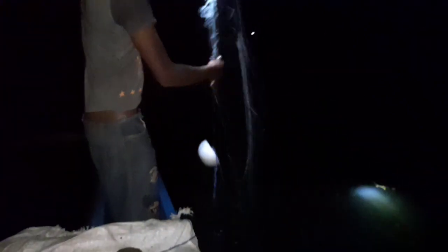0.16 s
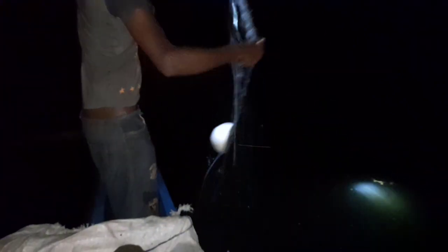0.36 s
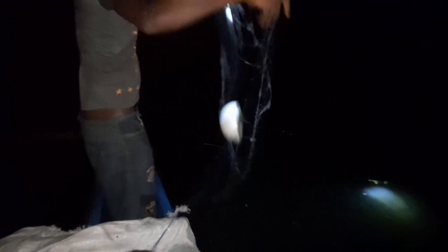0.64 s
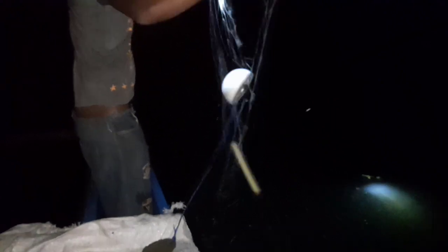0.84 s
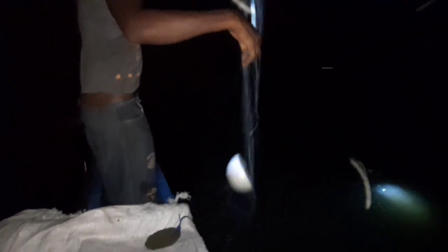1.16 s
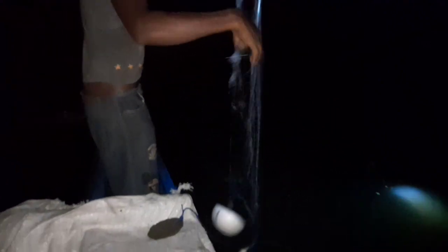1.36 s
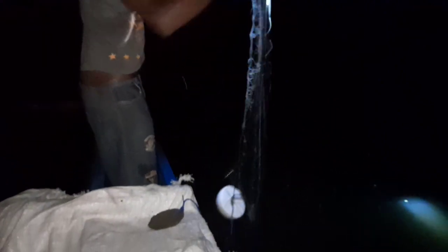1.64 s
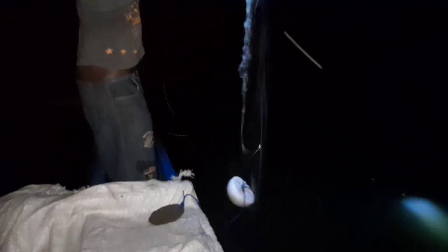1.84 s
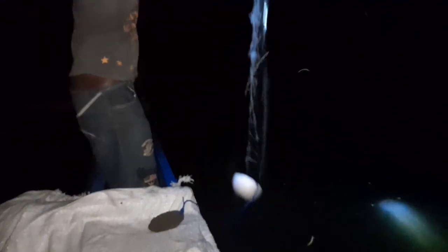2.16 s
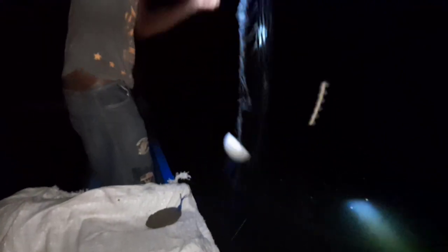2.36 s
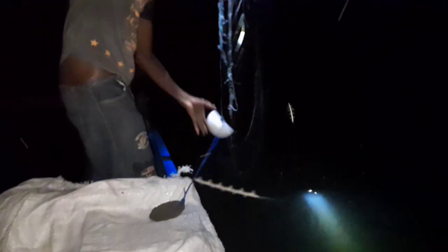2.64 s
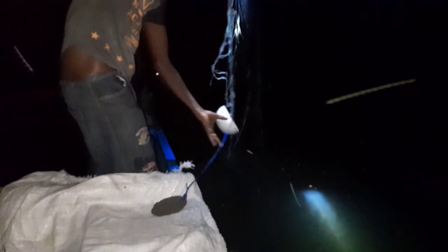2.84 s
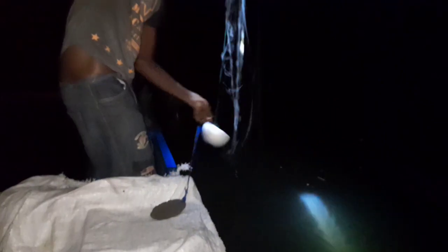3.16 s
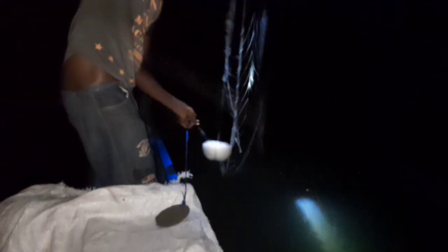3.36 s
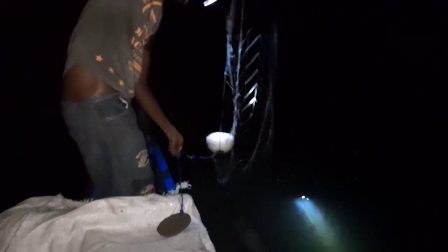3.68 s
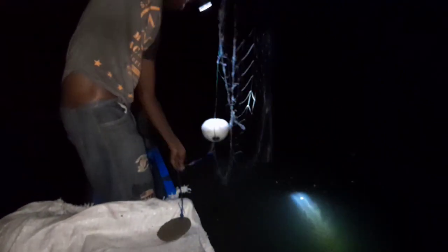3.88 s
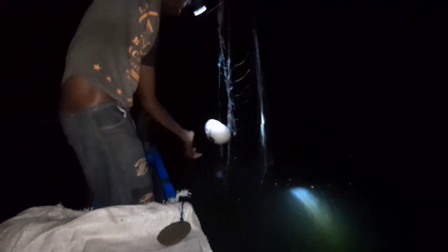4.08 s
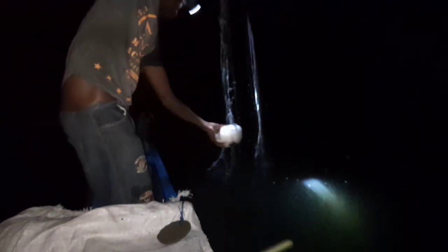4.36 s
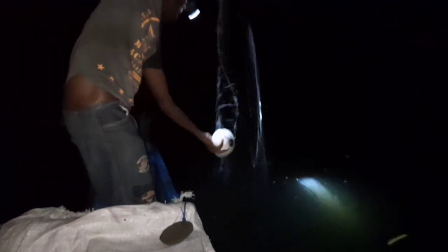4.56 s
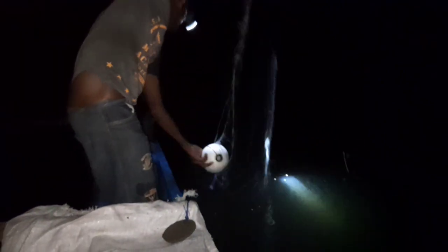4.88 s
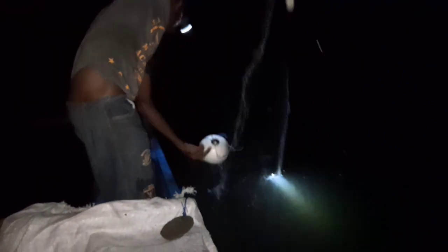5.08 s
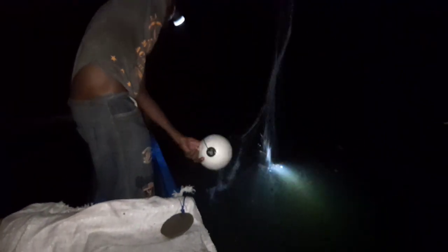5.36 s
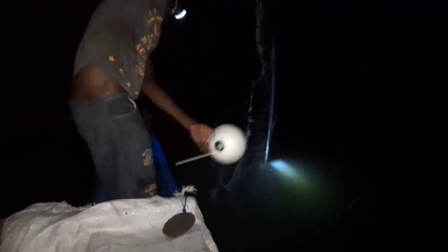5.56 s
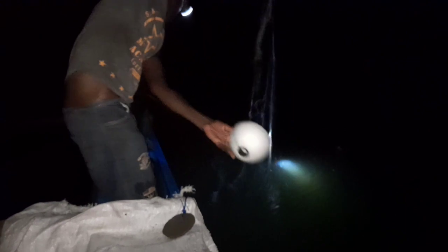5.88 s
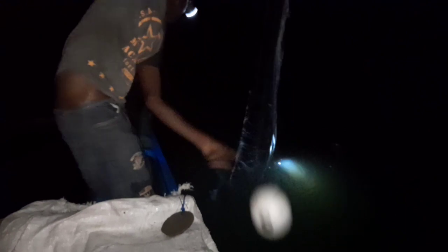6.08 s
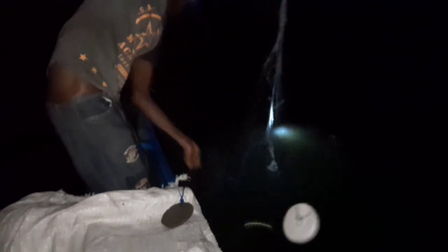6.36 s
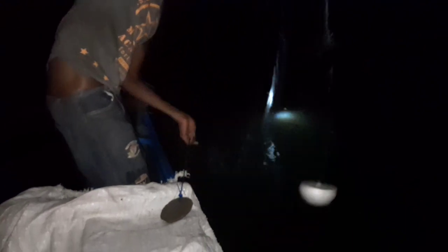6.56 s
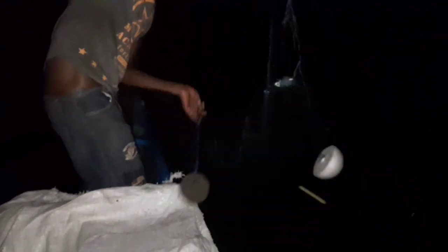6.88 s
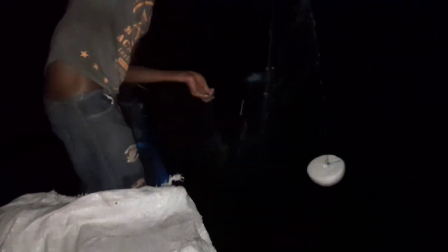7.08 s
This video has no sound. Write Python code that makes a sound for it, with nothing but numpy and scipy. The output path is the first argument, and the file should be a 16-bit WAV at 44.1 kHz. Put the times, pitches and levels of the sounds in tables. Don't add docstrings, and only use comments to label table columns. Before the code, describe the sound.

Insects sing steadily on a riverbank, one cricket chirping near, another in short far phrases, and a bush cricket ticking in fast high trills. Close to the microphone a wet net is dragged in roughly, leads clacking and hull booming, water spraying. It slackens to drips, plops and small snaps, a hollow rattle on the float, further light rasps, and a last heavy knock. Open outdoor air, soft low water slop.

```python
import sys
import numpy as np
from scipy import signal
from scipy.fft import rfft, irfft, next_fast_len
from scipy.io import wavfile
from scipy.ndimage import uniform_filter1d

SR = 44100
rng = np.random.default_rng(int(sys.argv[2]) if len(sys.argv) > 2 else 0)


def dump_mix(stems):
    frames = np.atleast_2d(stems).T
    limited = np.clip(frames, -1, 1)
    pcm = np.round(limited * 32767).astype(np.int16)
    wavfile.write(sys.argv[1], SR, pcm)


def decibels_to_gain(level_db):
    exponent = np.asarray(level_db, float) / 20
    return 10 ** exponent


N = 318132
SIZE = next_fast_len(N)
HZ = np.maximum(np.fft.rfftfreq(SIZE, 1 / SR), 1)
T = np.arange(N) / SR


def unit(x):
    return x / np.sqrt(np.mean(x ** 2))


def along(table):
    hz, value = np.transpose(table)
    return np.interp(np.log(HZ), np.log(hz), value)


def shape(x, gain):
    return irfft(rfft(x, SIZE) * gain, SIZE)[..., :N]


def band(lo_hz, hi_hz):
    return 1 / np.sqrt((1 + (lo_hz / HZ) ** 6) * (1 + (HZ / hi_hz) ** 6))


def walk(rate_hz):
    hold = int(SR / rate_hz)
    steps = rng.standard_normal(N // 100)[:N // hold + 1]
    stairs = np.repeat(steps, hold)
    return 1.6 * uniform_filter1d(uniform_filter1d(stairs, hold), hold)[:N]


# frequency in Hz, left-right correlation.
LEFT_RIGHT_LIKENESS = [(30, .75), (120, .93), (300, .88), (700, .8), (1400, .55), (3000, .15), (15000, .05)]


def wide(likeness=1.):
    c = np.clip(along(LEFT_RIGHT_LIKENESS) * likeness, 0, 1)
    mid, side = rfft(rng.standard_normal((2, SIZE)))
    side = side * np.array([[1], [-1]])
    return (np.sqrt(1 + c) * mid + np.sqrt(1 - c) * side) / np.sqrt(2)


def restless(gain, edges_hz, flicker_db, rate_hz, likeness=1.):
    noise = wide(likeness) * gain
    return [irfft(noise * band(lo, hi), SIZE)[:, :N] * decibels_to_gain(flicker_db * walk(rate_hz))
            for lo, hi in zip(edges_hz, edges_hz[1:])]


def place(times_s, sounds):
    out = np.zeros(N + sounds.shape[-1] + SR)
    first = (np.clip(times_s, 0, None) * SR).astype(int)
    np.add.at(out, first[:, None] + np.arange(sounds.shape[-1]), sounds)
    return out[:N]


def echoes(x, wet_db, t60_s, count=40, lag=8):
    response = np.zeros((2, int(t60_s * SR) + 9))
    when, size = rng.random((2, count)), rng.standard_normal((2, count))
    at = (np.arange(2)[:, None], (when * t60_s * SR).astype(int))
    np.add.at(response, at, decibels_to_gain(wet_db - 60 * when) * size)
    response[[0, 1], [0, lag]] += 1
    return signal.fftconvolve(x[None], response, axes=1)[:, :N]


# frequency in Hz, level in dB per Hz.
NIGHT_TONE = [(300, -6), (600, -11.5), (1140, -20), (2700, -13), (3200, -5.5), (3680, -22), (4250, -4.5),
              (4800, -19), (6300, -16.5), (7400, -25), (8800, -16), (9700, -17), (11500, -36), (14000, -23)]


def night():
    edges_hz = [300, 900, 2000, 3700, 5500, 8000, 16500]
    hiss = restless(decibels_to_gain(along(NIGHT_TONE)), edges_hz, flicker_db=1.4, rate_hz=12, likeness=.45)
    return unit(sum(hiss)) * decibels_to_gain(-56.5)


# time in seconds, level in dB.
LAP_LEVEL = [(0, -57), (.6, -53.5), (.8, -40), (1.0, -54), (1.3, -58), (2.3, -54.5), (3.0, -57),
             (3.7, -56.5), (4.3, -54), (4.9, -54.5), (5.4, -53.5), (6.4, -57.5), (6.85, -51.5), (7.21, -55)]
# frequency in Hz, level in dB per Hz.
LAP_COLOUR = [(20, -33), (35, -6), (52, 0), (78, 3.5), (131, -5), (184, -13.5), (312, -13.5), (550, -27)]


def lapping():
    s, db = np.transpose(LAP_LEVEL)
    colour = decibels_to_gain(along(LAP_COLOUR)) * band(15, 800)
    slop = restless(colour, [15, 60, 110, 200, 700], flicker_db=0.76, rate_hz=4.5, likeness=0.81)
    return unit(sum(slop)) * decibels_to_gain(np.interp(T, s, db) + 1.0)


def frogs():
    pulse_hz = 52 + 6 * walk(4)
    pulses = np.maximum(np.sin(2 * np.pi * np.cumsum(pulse_hz) / SR), 0) + 0.34
    voice = unit(irfft(wide(0.11) * band(1300, 3000) ** 2, SIZE)[:, :N])
    return voice * pulses * decibels_to_gain(-75.0 + 4.2 * walk(3.88))


def strokes(table, grip_s=0.019, let_go_db_per_s=475):
    main, second = 0, 0
    for start, stop, from_db, to_db, above_db in table:
        db = np.interp(T, (start, stop), (from_db, to_db)) - let_go_db_per_s * np.maximum(T - stop, 0)
        gain = np.clip((T - start) / grip_s + .5, 0, 1) * decibels_to_gain(db)
        main = np.maximum(main, gain)
        second = np.maximum(second, gain * decibels_to_gain(above_db))
    return main, second


# frequency in Hz, level in dB per Hz.
RASP_TONE = [(150, -0.5), (315, 2.5), (524, -10.5), (780, -2), (1050, -9.5), (2600, -6), (3200, -7.5),
             (3700, -14.5), (4400, -9.5), (5000, -5.5), (7700, -21.5), (11500, -6.5), (14500, -9.5)]
# start in seconds, stop in seconds, level in dB at start,
# level in dB at stop, weight on the hull in dB above it.
MESH_PULLS = [(0, .14, -51.5, -58.5, -19), (.18, .29, -53.5, -52.5, -6), (.29, .36, -52, -43.5, -6.5),
              (.36, .43, -44, -39, -15), (.43, .5, -38.5, -39.5, -12), (.5, .585, -37.5, -35.5, -6),
              (.6, .73, -44.5, -41.5, 0.5), (.74, .81, -41, -44, 8), (.82, .9, -40.5, -44.5, 2),
              (.9, .98, -46.5, -63, 0.5), (1.05, 1.35, -62, -96, -3), (2.68, 2.8, -58, -57.5, -6),
              (3.1, 3.26, -67, -58, -4), (3.29, 3.42, -56, -42, -3), (3.42, 3.52, -47.5, -49, 0),
              (3.72, 3.8, -53, -64, -19), (4.4, 4.455, -61, -58, -20), (4.5, 4.6, -77, -53, -27),
              (4.8, 4.89, -50, -51.5, -12), (4.925, 4.98, -43, -48, -2), (5, 5.2, -55.5, -60, -9),
              (5.2, 5.29, -52.5, -46, -15), (5.29, 5.4, -47.5, -59.5, -6), (5.4, 5.46, -53, -61, -15),
              (5.52, 5.58, -55, -63, 6), (5.66, 5.8, -59, -58, 0.5), (6.7, 6.77, -58, -48.5, -5.5),
              (6.785, 6.85, -37, -42, 1), (6.85, 6.89, -46, -38, -11), (6.9, 6.925, -26.5, -44, -9),
              (6.925, 6.953, -36, -47.5, -7), (6.96, 7.1, -64, -72.5, 8)]
# start in seconds, stop in seconds, spray in dB at start, spray in dB at stop, coarser hiss in dB above
WATER_STREAMS = [(.17, .3, -48, -57.5, 2), (.3, .73, -50.5, -40, 1), (.735, .895, -39.5, -42, 2.5),
                 (.93, 1.3, -55, -63, -1), (1.45, 1.56, -62, -58, -3), (3.295, 3.4, -55.5, -45.5, -1.5),
                 (3.4, 3.54, -47, -51.5, 2.5), (3.74, 3.9, -56, -56, -6), (4, 4.15, -59, -62, -13),
                 (5, 5.28, -55, -46.5, 3), (5.28, 5.39, -46, -53.5, 1), (5.91, 5.95, -53, -54, -4),
                 (6.33, 6.55, -73, -61.5, 6.5), (6.73, 6.85, -46.5, -43.5, -8),
                 (6.895, 6.94, -34, -37, -16)]
# level in dB of hull scrape, rasp, hiss, spray.
SLACK_NET_DB = [-67.5, -67, -59.5, -61.5]


def haul():
    when, size = rng.random((2, 900))
    fade = np.exp(-np.arange(220) / 4.9)
    strength = decibels_to_gain(-5 * np.log(size + .04))
    crackle = place(when * N / SR, strength[:, None] * fade)
    stutter_db = 1.5 * walk(250) + 1.0 * walk(60)
    grain = decibels_to_gain(stutter_db) * (1 + 0.33 * crackle)
    edges_hz = [200, 600, 1000, 1600, 2300, 3000, 3900, 8500, 16500]
    bands = restless(decibels_to_gain(along(RASP_TONE)), edges_hz, flicker_db=2.4, rate_hz=25)
    layers = [sum(bands[:2]), sum(bands[2:6]), bands[6], bands[7]]
    rasp, scrape = strokes(MESH_PULLS)
    spray, hiss = strokes(WATER_STREAMS)
    rush = 0
    for layer, gain, slack_db in zip(layers, (scrape, rasp, hiss, spray), SLACK_NET_DB):
        slack = decibels_to_gain(slack_db + 1.3 * walk(6.2))
        rush = rush + unit(layer) * np.hypot(gain, slack)
    return decibels_to_gain(-3.5) * grain * rush


def paced(marks_s, period_s):
    number = np.cumsum(np.round(np.diff(marks_s, prepend=marks_s[0]) / period_s))
    return np.interp(np.arange(number[-1] + 1), number, marks_s)


def syllables(times_s, db, hz, fall_hz, length_s, rise_s):
    t = np.arange(int(length_s * SR)) / SR
    swell = np.minimum(t / rise_s, 1) * np.sqrt(1 - t / length_s)
    cycles = np.asarray(hz)[:, None] * t - fall_hz * t ** 2 / (2 * length_s)
    cycles = cycles + rng.random((len(times_s), 1))
    return place(times_s, decibels_to_gain(np.asarray(db))[:, None] * swell * np.sin(2 * np.pi * cycles))


TRILL_ENDS = (0.0974, 0.462, 0.794, 1.0813, 1.4312, 1.823, 2.191, 2.5376, 2.893, 3.514, 3.993, 4.2401,
              4.473, 4.8684, 5.494, 5.7317, 6.603, 7.204)
# time in seconds, level in dB.
TRILL_LEVEL = [(0, -55.5), (1.5, -51.5), (3.0, -50.5), (5.0, -51.5), (7.2, -54)]


def bush_cricket(count=11):
    s = paced(TRILL_ENDS, period_s=.123)
    db = np.interp(s, *np.transpose(TRILL_LEVEL))
    back, chance = np.arange(count), rng.standard_normal((len(s), count, 3))
    times_s = s[:, None] - .0077 * back - .002 + 0.000096 * chance[..., 0]
    loud_db = db[:, None] + 6.0 - 0.032 * back ** 2 + 0.58 * chance[..., 1]
    hz = 9700 + 60 * chance[..., 2]
    song = syllables(times_s.ravel(), loud_db.ravel(), hz.ravel(), 290, length_s=0.0032, rise_s=0.00069)
    return echoes(song, -13.5, 0.12)


CRICKET_BOUTS = [
    (0.0456, 0.4983, .7191, .9437, 1.6052, 2.063, 2.505, 3.0698, 3.509, 3.6254, 3.9558, 4.1837, 4.4034, 4.6244, 4.852, 4.9667, 5.1934, 5.745, 5.9689),
    (6.2678, 6.596, 6.8107, 7.0387, 7.149),
]
# time in seconds, Hz at syllable start, peak in dB.
CRICKET_DRIFT = [(0, 4520, -44), (.4, 4740, -40.5), (.8, 4710, -38.5), (1.0, 4700, -40.5), (2.0, 4746, -39),
                 (2.7, 4736, -39), (4.5, 4743, -38.5), (5.3, 4730, -39.5), (6.0, 4735, -41),
                 (7.2, 4720, -43.5)]


def cricket():
    s = np.concatenate([paced(bout, period_s=.1117) for bout in CRICKET_BOUTS])
    at, hz, db = np.transpose(CRICKET_DRIFT)
    wobble_db = 1.3 * rng.standard_normal((len(s), 2)).T
    hz, db = np.interp(s, at, hz), np.interp(s, at, db) + wobble_db
    first = syllables(s, db[0], hz, 600, length_s=0.012, rise_s=0.003)
    second = syllables(s + .0171, db[1] - .8, hz - 30, 620, length_s=0.013, rise_s=0.002)
    return decibels_to_gain(0.5) * echoes(first + second, -12, .07)


# first syllable in seconds, last syllable in seconds.
FAR_PHRASES = [(.102, .22), (.348, .428), (1.16, 1.24), (1.428, 1.543), (1.696, 1.818), (1.966, 2.045),
               (2.19, 2.273), (2.449, 2.528), (2.71, 2.79), (2.982, 3.102), (3.252, 3.334), (3.51, 3.55),
               (3.689, 3.807), (3.917, 3.957), (4.106, 4.225), (4.401, 4.48), (4.632, 4.711), (4.885, 4.97),
               (5.148, 5.226), (5.414, 5.493), (5.697, 5.78), (5.934, 6.051), (6.21, 6.286), (6.457, 6.534),
               (6.696, 6.776), (7.067, 7.188)]


def far_cricket():
    times_s = np.concatenate([np.linspace(a, b, round((b - a) * 25) + 1) for a, b in FAR_PHRASES])
    db = -50 + 0.6 * rng.standard_normal(len(times_s))
    hz = np.full(len(times_s), 6450.)
    song = syllables(times_s - .005, db, hz, 250, length_s=0.011, rise_s=0.0089)
    return echoes(song, -12, .07)


# frequency in Hz, level in dB.
FLOAT_MODES = [(930, -5), (2740, -14), (5050, -3)]


def ticks(table, t60_s, ring_db, float_db, broad_db):
    s, db, hz, treble_db = np.transpose(table)
    t60_s = np.clip(t60_s * (hz / 1000) ** -0.23, .005, .3)
    t = np.arange(int(.12 * SR)) / SR
    fade = decibels_to_gain(db[:, None] - 60 * t / t60_s[:, None]) * np.minimum(t / 0.0011, 1) * decibels_to_gain(1.5)
    noise = rng.standard_normal((len(s), 2, len(t)))
    mix = rng.standard_normal((len(s), len(FLOAT_MODES), 2))
    ring = decibels_to_gain(ring_db) * np.sin(2 * np.pi * hz[:, None] * t * (1 + 1.7 * t))
    for k, (f, mode_db) in enumerate(FLOAT_MODES):
        mode_hz = f * (1 + .04 * mix[:, k, 1:])
        ring = ring + decibels_to_gain(float_db + mode_db + 2.5 * mix[:, k, :1]) * np.sin(2 * np.pi * mode_hz * t)
    body = band(700, 1200) ** 2 + 2 * band(2300, 3200) ** 3 + 2 * band(4500, 5600) ** 3
    broad = decibels_to_gain(broad_db) * band(500, 3600) + decibels_to_gain(broad_db - 6) * band(3600, 7000)
    crack = shape(place(s, fade * noise[:, 0]), .6 * body + broad)
    spit = shape(place(s, decibels_to_gain(treble_db)[:, None] * fade * noise[:, 1]), band(9000, 15500))
    return echoes(place(s, fade * ring) + crack + 1.2 * spit, -18, .05, lag=2)


# start in seconds, peak in dB, bubble in Hz, treble in dB above it.
LONE_DROPS = [(.175, -41.5, 2020, 9), (1.044, -46, 1870, -22), (1.072, -38, 3040, -3),
              (1.42, -41, 1720, -19), (1.49, -43.5, 914, -21.5), (1.724, -50, 950, -20),
              (1.915, -40, 730, -20), (2.012, -53, 790, -20), (2.18, -42.5, 2970, 14),
              (2.187, -45, 2950, 13), (2.704, -41, 2330, -18), (3.2, -45, 870, -20), (3.494, -39, 804, 5),
              (3.69, -49, 1600, -20), (3.74, -41.5, 1550, -15), (3.885, -45, 946, -20),
              (4.192, -41.5, 1630, -22), (4.434, -38, 2720, -20), (4.45, -40.5, 850, -20),
              (4.589, -34, 2800, 5.5), (4.716, -41.5, 830, -26), (5.43, -46, 1025, -20)]


def drops():
    return ticks(LONE_DROPS, t60_s=0.052, ring_db=-8.5, float_db=-16, broad_db=-17)


# start in seconds, peak in dB, ringing in Hz, treble in dB above it.
LEAD_CLACKS = [(.551, -15, 1860, -3), (.566, -17.5, 1250, -20), (.572, -16, 1920, -21.5),
               (.609, -45, 1000, -8), (.676, -24.5, 785, -17), (.699, -29, 805, -12),
               (.741, -18.5, 760, -4), (.761, -22, 770, 5.5), (.791, -30, 790, -10), (.822, -22, 1540, -6),
               (.861, -18, 1530, -16), (.875, -20.5, 2460, -20), (3.396, -22.5, 1900, -1),
               (5.521, -33.5, 2780, -4), (5.547, -31, 2570, -34), (6.766, -29, 2740, -10),
               (6.786, -24.5, 800, -25), (6.794, -25, 770, -20), (6.838, -21.5, 2600, -17),
               (6.844, -23, 2500, -17), (6.877, -26, 2460, 2), (6.897, -25, 734, -2),
               (6.927, -19.5, 2420, 7), (6.932, -29, 2850, 12), (6.940, -22, 2280, 5),
               (6.947, -33, 2600, -5)]


def clacks():
    return ticks(LEAD_CLACKS, t60_s=0.014, ring_db=-6.5, float_db=-12, broad_db=-14.5)


# start in seconds, peak in dB, main mode in Hz, t60 in seconds,
# plank modes in dB above it.
HULL_KNOCKS = [(0.6843, -29, 110, 0.081, -9), (.7385, -21, 139, 0.084, 3.5), (0.8204, -23.5, 130, 0.084, 3),
               (.860, -25, 116, 0.11, -7), (1.906, -48, 184, 0.085, -4), (1.938, -45, 109, 0.069, -15),
               (1.965, -38.5, 110, 0.053, -18), (3.394, -40.5, 102.7, .11, -7.5),
               (3.542, -41, 135, 0.15, -10), (3.572, -46, 71, 0.25, -4), (3.732, -45, 70, 0.51, -14),
               (4.58, -40, 94, 0.073, -13), (4.97, -37.5, 73, 0.14, -12), (6.768, -30.5, 119, 0.1, -12),
               (6.790, -32, 148, 0.04, -1), (6.798, -17, 123, 0.052, -7), (6.822, -17, 105, 0.084, -16),
               (6.862, -31, 91, 0.13, -12), (6.897, -22.5, 140, 0.087, 2.5), (6.924, -29, 179, 0.063, 1),
               (6.951, -27.5, 76.4, 0.1, -10)]
# frequency in Hz, level in dB, t60 in seconds.
PLANK_MODES = [(231, -11.5, 0.068), (300, -2, 0.0297), (384, -13, 0.025), (790, -10.5, 0.085)]


def knocks():
    s, db, hz, t60_s, plank_db = np.transpose(HULL_KNOCKS)
    t = np.arange(int(.3 * SR)) / SR
    mix = rng.standard_normal((len(s), len(PLANK_MODES), 2))
    fade = decibels_to_gain(3.0 - 60 * t / np.clip(t60_s, .02, .5)[:, None])
    boom = np.minimum(t / 0.0085, 1) * fade * np.sin(2 * np.pi * hz[:, None] * t)
    for k, (f, mode_db, ring_s) in enumerate(PLANK_MODES):
        mode_hz = f * (1 + 0.035 * mix[:, k, 1:])
        level_db = plank_db[:, None] + mode_db + mix[:, k, :1] - 60 * t / ring_s
        boom = boom + decibels_to_gain(level_db) * np.sin(2 * np.pi * mode_hz * t)
    blows = place(s, -decibels_to_gain(db)[:, None] * boom * np.minimum(t / .0012, 1))
    return echoes(blows, -16, .025, lag=1)


# start in seconds, peak in dB, faint body in Hz, treble in dB above
SNAPPING_DROPS = [(1.095, -45, 1900, -10), (1.786, -41, 1320, 2), (1.797, -43, 1390, -10),
                  (1.899, -37, 2000, -2), (1.906, -38, 1900, -15), (3.14, -42, 1080, -25),
                  (3.255, -42, 3100, -20), (3.297, -37.5, 2000, 2), (4.004, -39.5, 2980, -10),
                  (4.128, -46, 2300, -20), (4.359, -41.5, 940, -17), (4.366, -43, 1000, -20),
                  (4.451, -38.5, 1710, -10), (4.58, -42.5, 1350, -5), (4.595, -49, 1400, -4),
                  (6.697, -34, 2630, 7.5)]


def snaps():
    return ticks(SNAPPING_DROPS, t60_s=0.028, ring_db=-10, float_db=-18, broad_db=-3)


# frequency in Hz, level in dB per Hz.
FLICK_COLOUR = [(1200, -25.5), (1700, -20.5), (2200, -23.5), (2500, -6), (2760, -6.5), (3000, 0),
                (3700, -16), (4300, -13.5), (5100, -8), (6000, -16), (7000, -18), (8350, -29),
                (9500, -22.5), (13000, -18), (15000, -30)]


def flick(start_s=2.072, rise_s=0.024, peak_db=-33, fade_db_per_s=119):
    edges_hz = [1000, 2200, 2750, 3900, 16500]
    low, lower, upper, high = restless(decibels_to_gain(along(FLICK_COLOUR)), edges_hz, flicker_db=1.2, rate_hz=140)
    age = (T - start_s) / rise_s
    late = np.clip(age / 2.2, 0, 1) ** 2
    hiss = decibels_to_gain(-0.5) * late * low + decibels_to_gain(-2.0 - 9.0 * late) * lower + upper + high
    hiss = hiss / np.std(upper + high)
    fade_db = -fade_db_per_s * rise_s * np.maximum(age - 1, 0)
    side_db = np.array([[-1.5], [3.]])
    return hiss * np.clip(age, 0, 1) ** 0.45 * decibels_to_gain(peak_db + fade_db + side_db)


# start in seconds, peak in dB, ringing in Hz, treble in dB above it.
LINE_RATTLE = [(4.795, -32, 980, -40), (4.802, -30, 2720, -26), (4.815, -33, 2860, -30),
               (4.824, -41, 2800, -30), (4.831, -41, 2900, -30), (4.852, -34, 1110, -14),
               (4.856, -30.5, 2580, -20), (4.861, -36, 2700, -25), (4.873, -35, 2570, -34.5),
               (4.903, -35, 2700, -30), (4.912, -23.5, 2700, -29), (4.917, -17, 2620, -40),
               (4.927, -26, 2650, -28), (4.932, -22.5, 2650, -30), (4.938, -28, 2680, -30),
               (4.944, -31, 2780, -30), (4.949, -31, 2600, -30), (4.954, -32, 2000, -30),
               (4.960, -31, 2860, -24), (4.965, -35, 2700, -25), (4.976, -30.5, 2780, -4)]


def rattle():
    return ticks(LINE_RATTLE, t60_s=0.018, ring_db=-7, float_db=-6.5, broad_db=-15)


def scene():
    boat = lapping() + haul() + drops() + clacks() + knocks() + snaps() + flick() + rattle()
    bush_side, bank_side = decibels_to_gain(np.array([[-1.2], [1.2]])), decibels_to_gain(np.array([[-.3], [.3]]))
    bank = frogs() + bush_side * bush_cricket() + cricket() + far_cricket()
    return night() + boat + bank_side * bank


def band_limit(x):
    return signal.sosfilt(signal.butter(12, 16460, fs=SR, output="sos"), x)


# frequency in Hz, left minus right in dB.
PORT_TILT = [(30, -5), (80, -1.5), (200, 0), (380, -4), (700, 2.5), (1300, 5.5), (2400, -8), (4400, -8),
             (8000, -4.5), (15000, -3.5)]


def record(dry):
    tilt_db = along(PORT_TILT) / 2
    edges = band(47, 15300) / np.sqrt(1 + (HZ / 15200) ** 80)
    mix = shape(dry, edges * decibels_to_gain(np.array([tilt_db, -tilt_db])))
    return band_limit(mix)


dry = scene()
out = record(dry)
dump_mix(out)
```